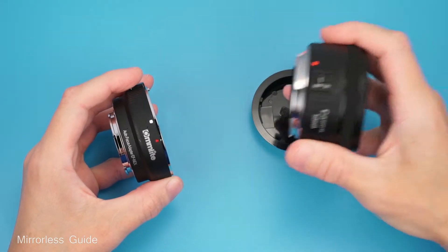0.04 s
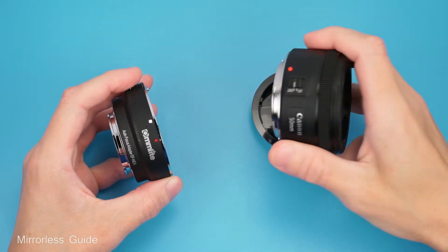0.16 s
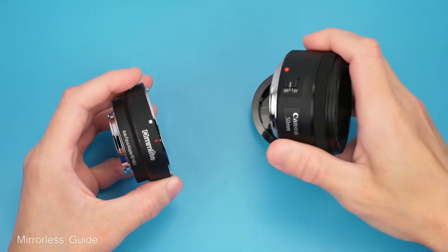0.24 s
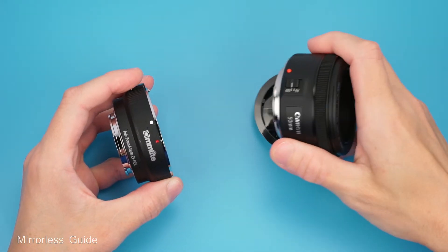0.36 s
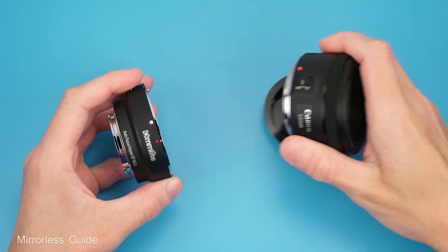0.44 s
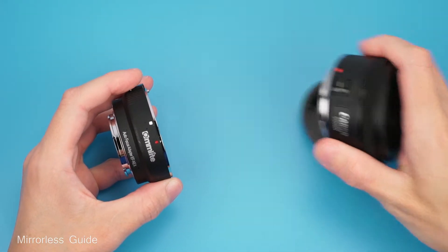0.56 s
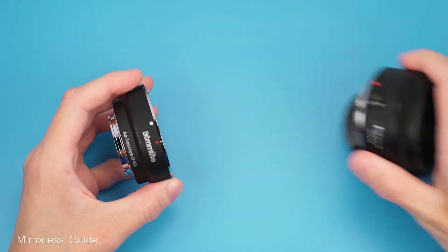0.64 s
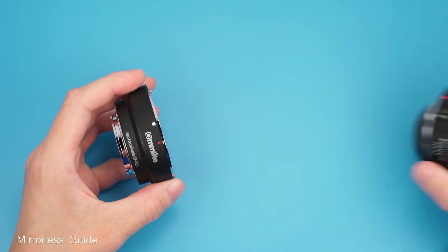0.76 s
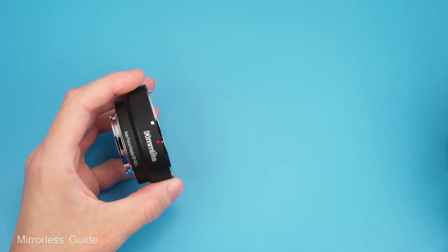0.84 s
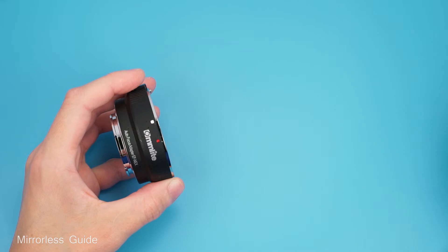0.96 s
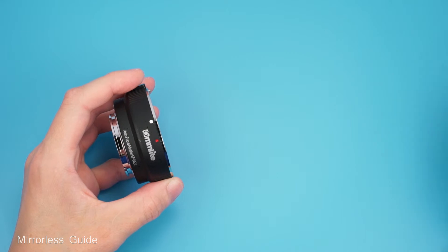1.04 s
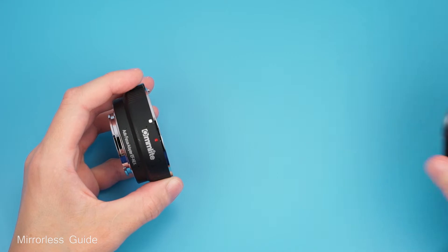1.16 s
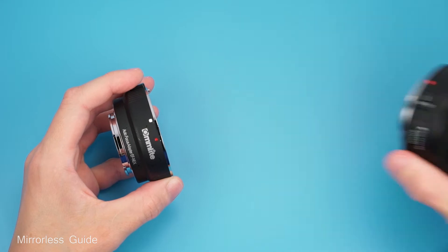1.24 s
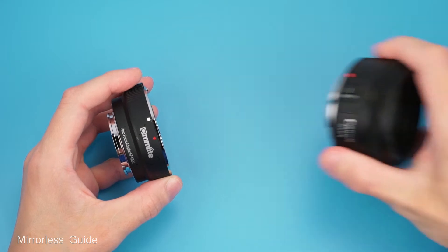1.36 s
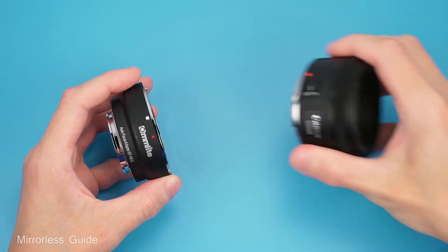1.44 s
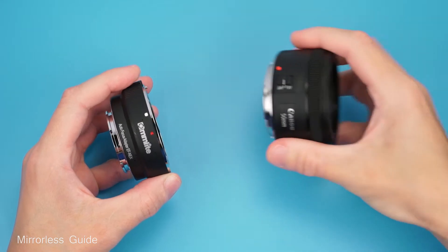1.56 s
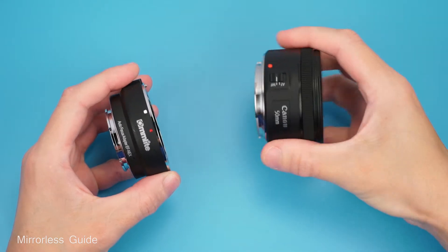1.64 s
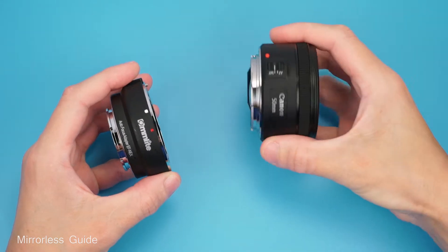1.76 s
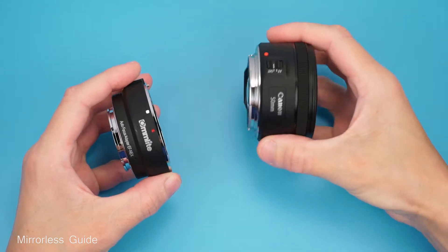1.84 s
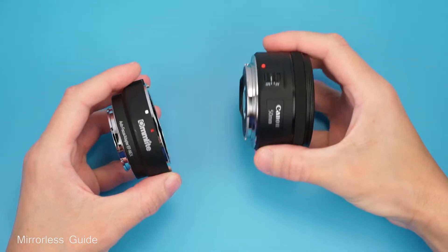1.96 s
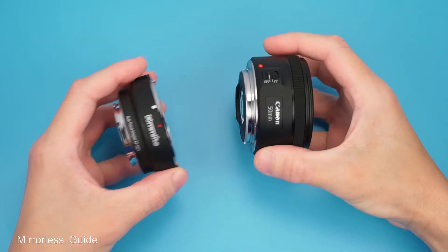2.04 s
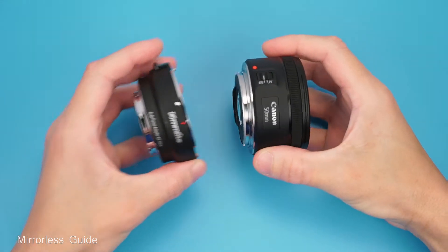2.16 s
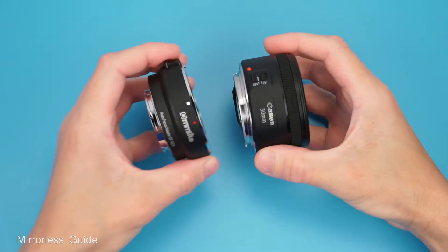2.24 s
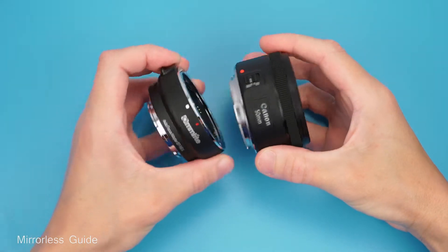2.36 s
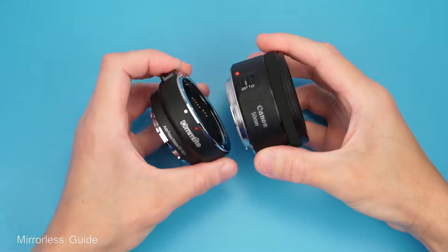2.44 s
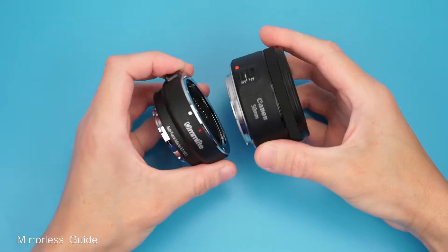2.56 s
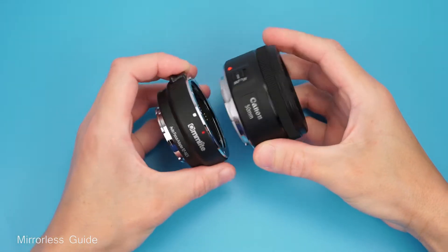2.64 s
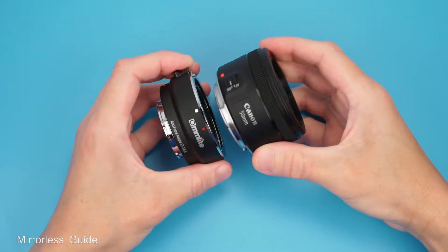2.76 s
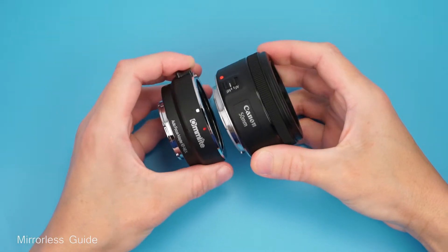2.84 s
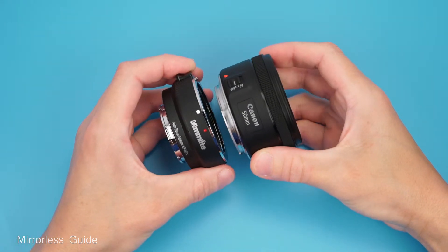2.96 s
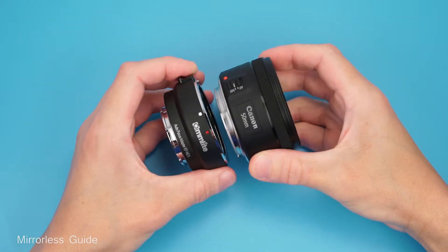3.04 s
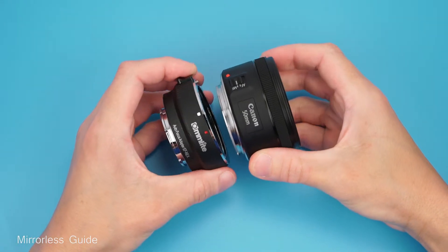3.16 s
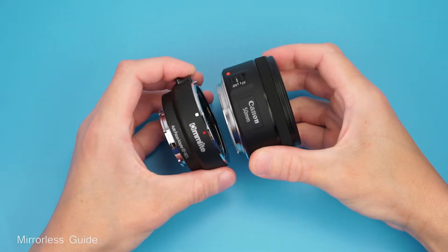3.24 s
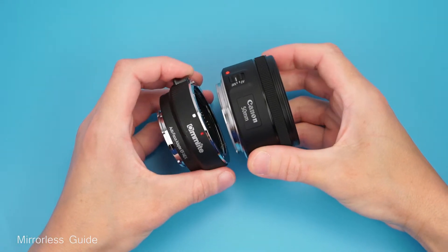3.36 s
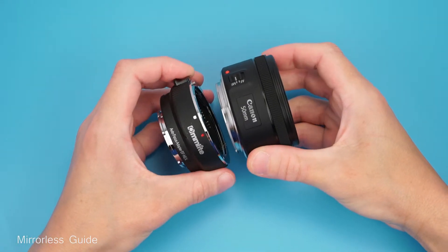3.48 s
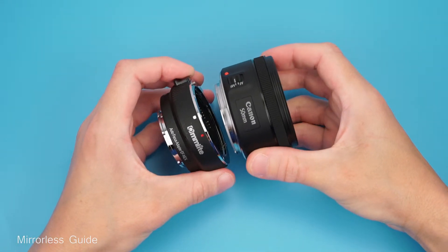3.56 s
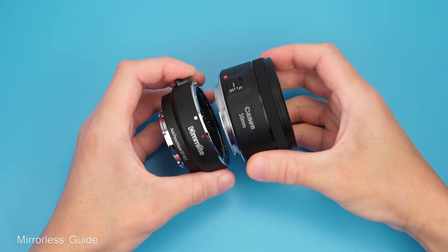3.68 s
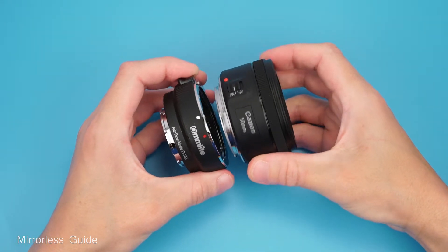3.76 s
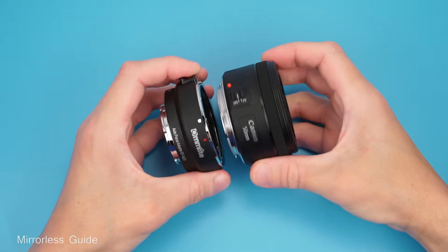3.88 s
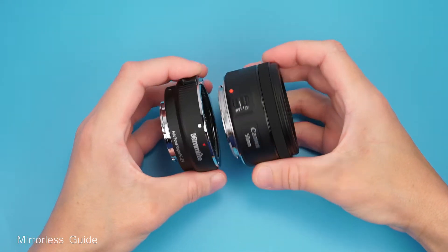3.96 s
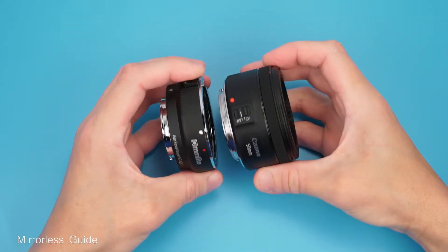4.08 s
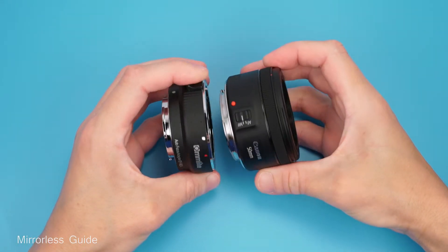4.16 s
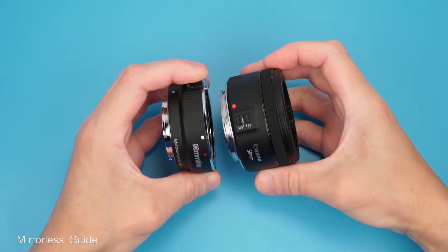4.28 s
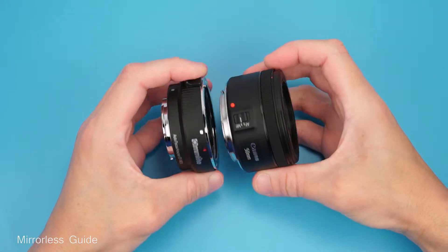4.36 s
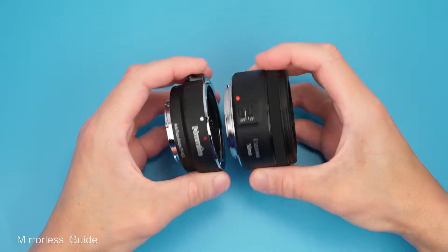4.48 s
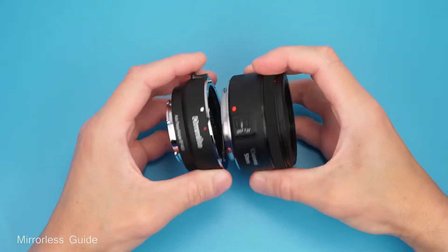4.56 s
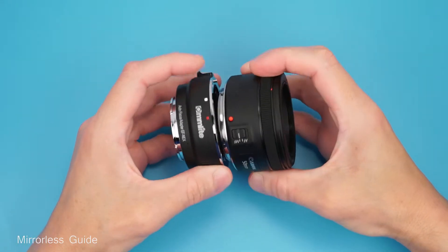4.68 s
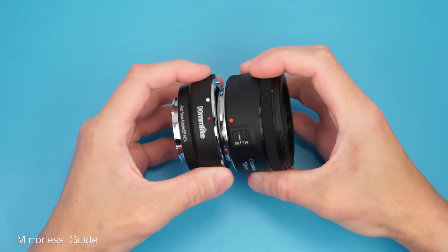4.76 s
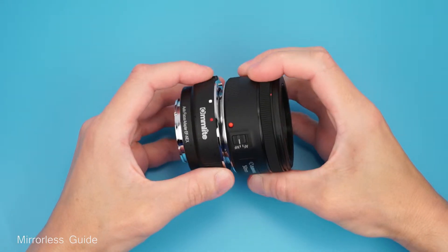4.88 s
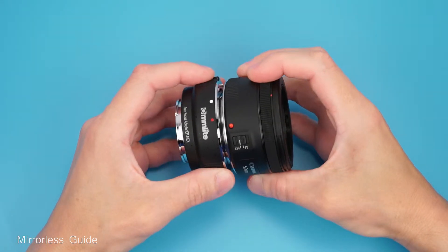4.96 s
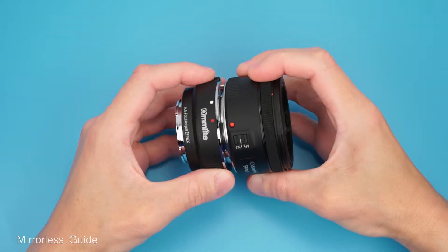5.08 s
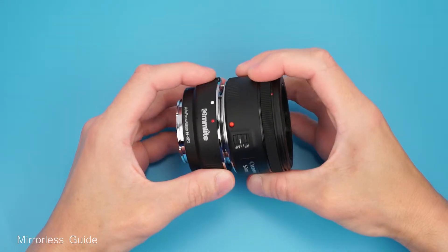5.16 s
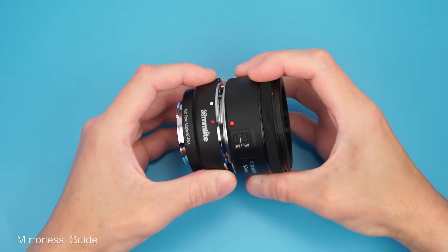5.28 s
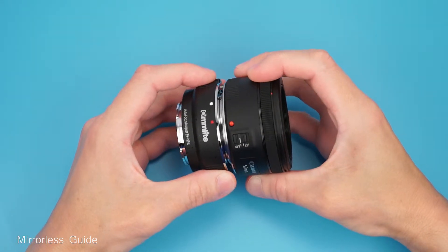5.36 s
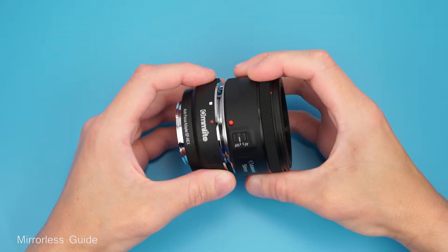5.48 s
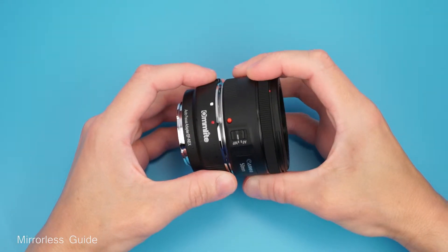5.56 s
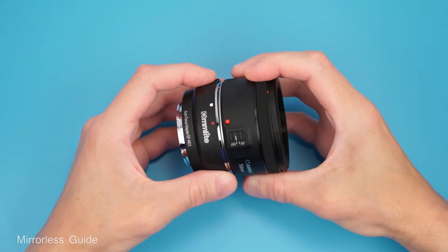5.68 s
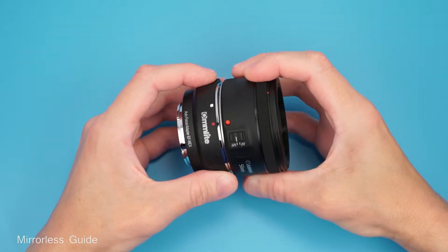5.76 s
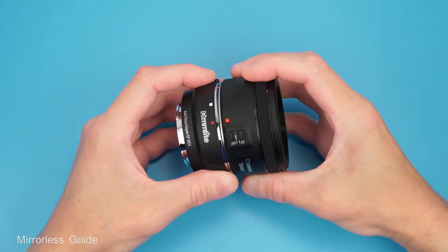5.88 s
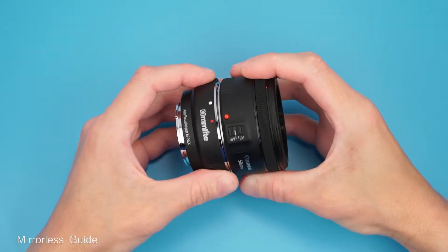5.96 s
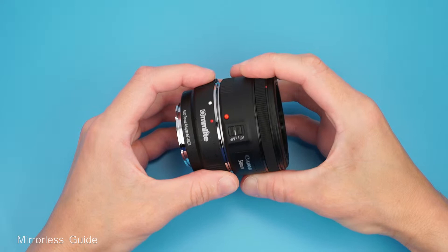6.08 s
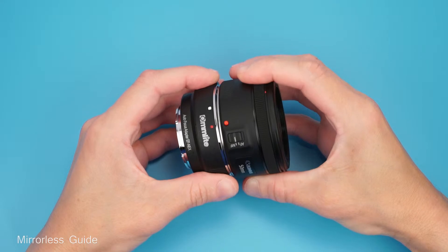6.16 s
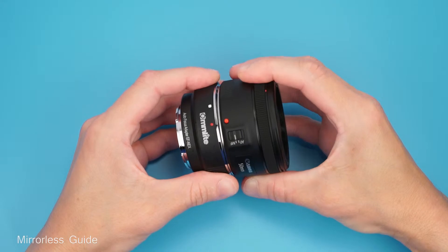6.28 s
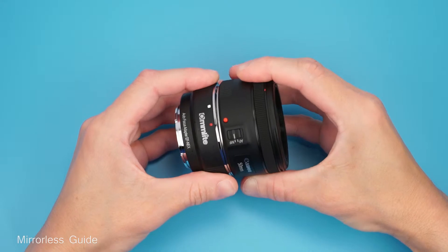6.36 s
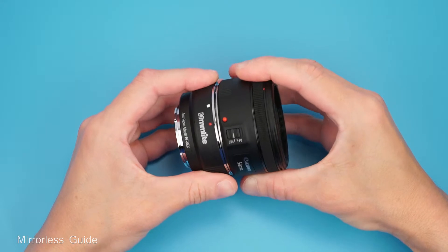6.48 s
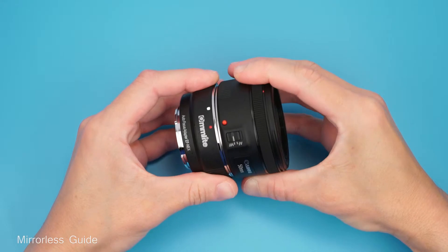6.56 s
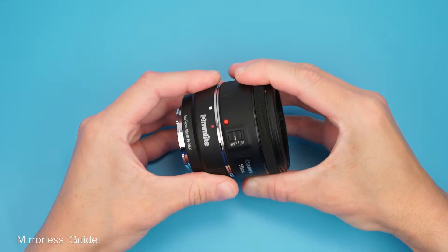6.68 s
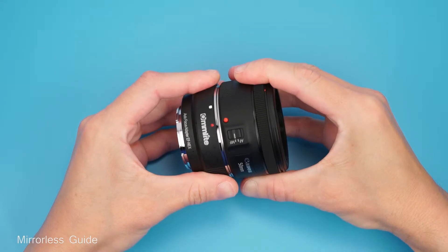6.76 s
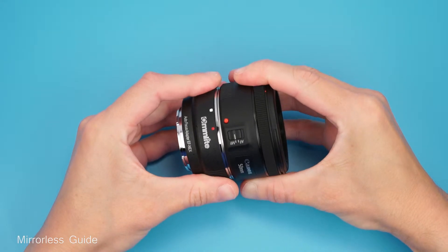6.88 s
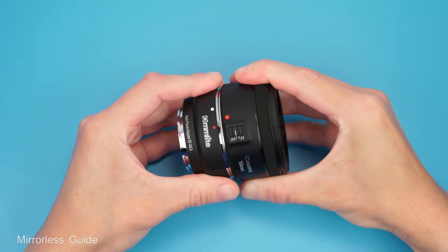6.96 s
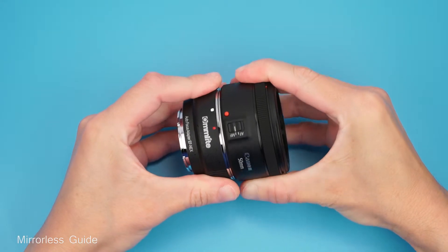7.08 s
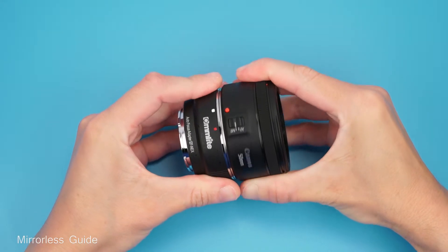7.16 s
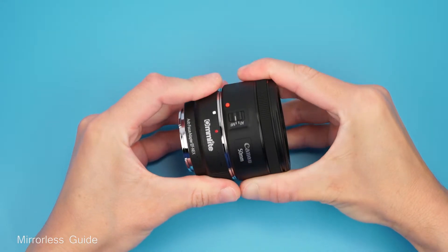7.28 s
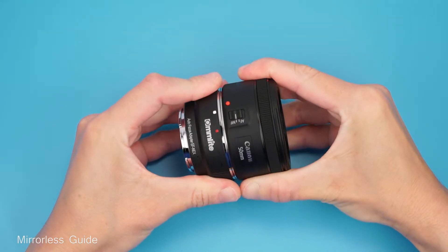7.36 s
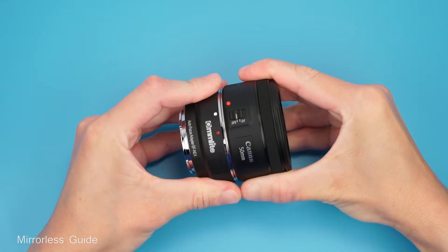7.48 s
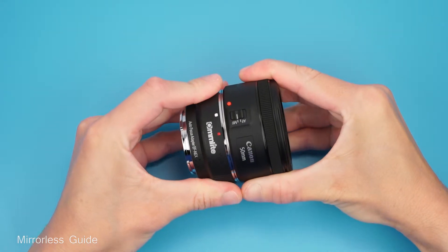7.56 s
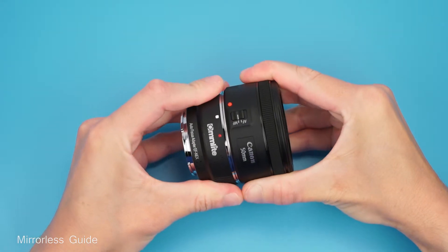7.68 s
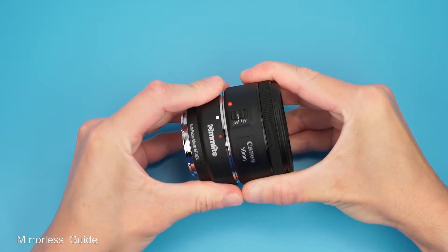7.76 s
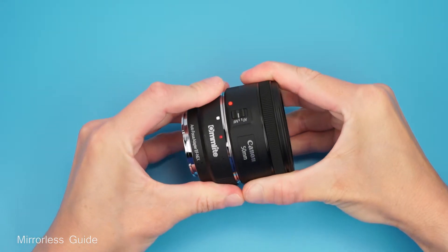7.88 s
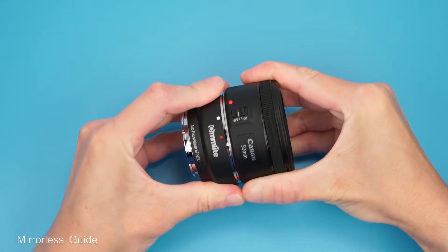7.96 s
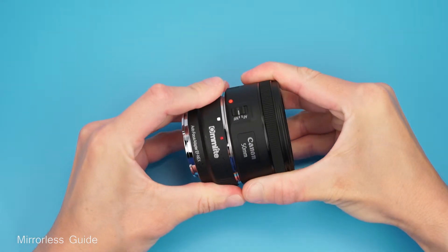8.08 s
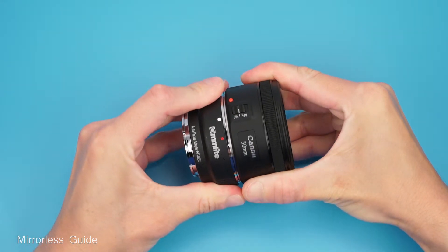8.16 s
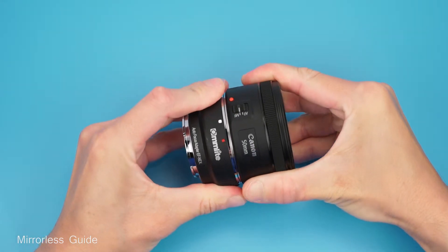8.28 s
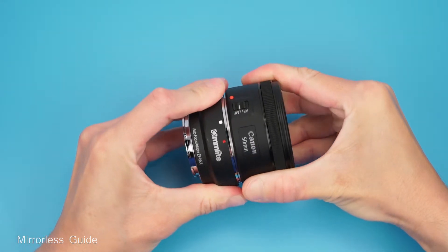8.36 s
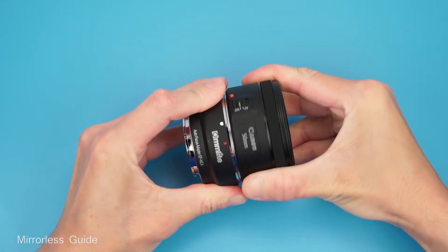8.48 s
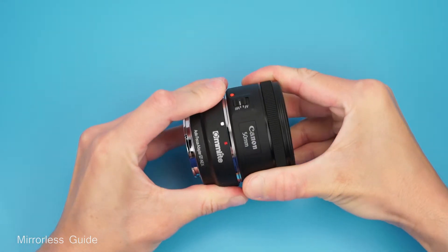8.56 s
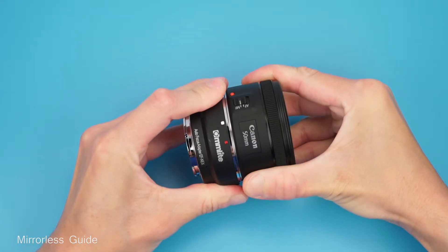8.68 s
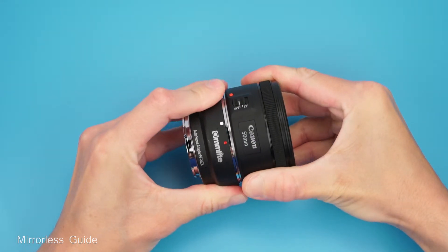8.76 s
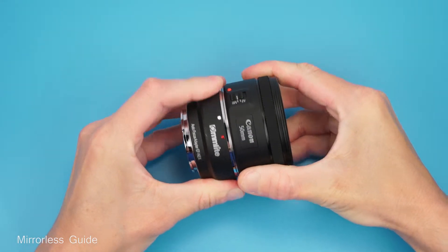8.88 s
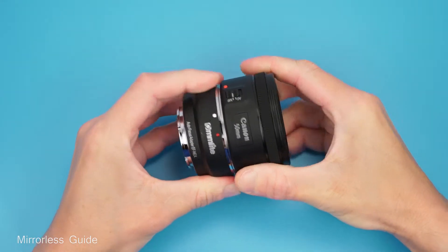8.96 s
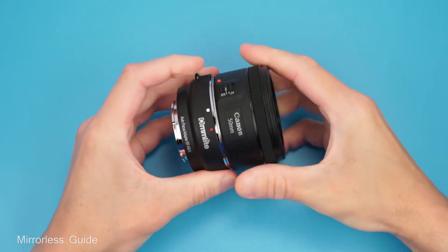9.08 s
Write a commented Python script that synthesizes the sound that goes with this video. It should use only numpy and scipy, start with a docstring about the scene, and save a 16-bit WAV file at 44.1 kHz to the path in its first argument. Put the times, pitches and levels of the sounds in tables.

```python
"""Close to a stereo microphone in a small quiet room, a plastic rear cap scrapes across a table and drops
flat with a knock (1.2 s). Fingers shift on a lens and tap a metal adapter (2.2 s). From 5 s the bayonet
mounts click, chatter and rub, ringing the metal and the air trapped between them, until they latch (8.6 s)
and the locking pin sings faintly. The room answers with a short tail over its steady hush."""
import sys
import numpy as np
from scipy import signal
from scipy.fft import rfft, irfft, next_fast_len
from scipy.io import wavfile
from scipy.ndimage import uniform_filter1d

SR = 44100
rng = np.random.default_rng(int(sys.argv[2]) if len(sys.argv) > 2 else 0)


def to_wav(sig):
    """Store sig (one row per channel, or 1-D mono) as 16-bit WAV at the path in sys.argv[1].

    Samples outside -1..1 are clipped; the rate is SR.
    """
    pcm = np.clip(np.atleast_2d(sig), -1, 1) * 32767
    pcm = np.round(pcm).astype(np.int16)
    wavfile.write(sys.argv[1], SR, pcm.T)  # frames by channels


N = 402633
HZ = np.arange(4097) * SR / 8192  # frequency axis of one hit
LEAD_S = .004  # silence ahead of each crack

# metal-on-metal hits: t/s, peak at 2.5-4.5 kHz/dB, hollow tilt/dB, treble tilt/dB, decay/ms
MOUNT_HITS = [(5.025, -36, -7.5, -5.5, 6.4), (5.093, -52, 1.5, -20, 3.9), (5.152, -55.5, -7, -22, 3),
              (5.2012, -38, -5, -9.5, 3.3), (5.277, -33, -3, -8, 2.9), (5.354, -36, -6, -12, 4.2),
              (5.3669, -33, -5, -4.5, 4.8), (5.3992, -40.5, 2.5, -10, 5.7), (5.4085, -41, -1.5, -5, 2.7),
              (5.643, -44.5, 3, -9.5, 7.2), (5.664, -45.5, 1, -13, 6), (5.682, -40.5, -8, -16, 22),
              (5.7018, -30.5, -6, 0.5, 1.7), (5.71, -16.5, -6, -3.5, 2.7), (5.7256, -27, -5, -7, 5.2),
              (5.834, -44, -9, -17, 2.4), (6.0906, -19, -9, -7.5, 2.6), (6.299, -49.5, -3.5, -8, 3.5),
              (6.313, -57, 2.5, -14, 2.2), (6.4673, -26, -4.5, -4.5, 2.5), (6.703, -59, -15.5, 0, 6.6),
              (6.721, -52.5, -12.5, -6, 5.3), (6.9122, -47, -16, 3.5, 4.1), (6.936, -44, -24, -4, 3.6),
              (6.946, -34.5, -17.5, 5, 5.5), (6.9667, -41.5, -15, -1, 4.1), (7.1, -37, -17, 4, 2.1),
              (7.108, -36.5, -15, -0.5, 5.9), (7.116, -46.5, -28, 11.5, 1.5), (7.1279, -40, -24, 2.5, 3.1),
              (7.1395, -33, -18, 2, 6.1), (7.166, -36, -27, 6.5, 5.9), (7.222, -45, -18, 2, 2.5),
              (7.2397, -37, -20, 1.5, 5), (7.255, -36.5, -23, -1, 2.4), (7.273, -33.5, -21, 4.5, 4),
              (7.3023, -37, -30, -1, 3.9), (7.3266, -32.5, -17.5, 4, 3.9), (7.382, -45, -18, -17, 1.8),
              (7.539, -51, -7, -3, 3.3), (7.568, -56, -12, 1.5, 2.8), (7.6, -60, -8, -8, 2.6),
              (7.8011, -48.5, -18, 6, 3.8), (7.8944, -60, -15, 3, 3), (7.9405, -52, -15, 7, 3.4),
              (8.13, -41, -17, 8, 4), (8.2566, -65, -10.5, 13.5, 2.8), (8.3399, -45, -9, 3, 6.2),
              (8.614, -50, -10, 3, 5.7), (8.6483, -18.5, -13, -1, 0.89)]
# modes of lens and adapter, the lowest from air trapped between them: f/Hz, width/Hz, level/dB
MOUNT_MODES = [(635, 375, 8.5), (1070, 193, 16.5), (1410, 150, 15), (2410, 430, 5.5), (2810, 142, 8.5),
               (3155, 130, 13), (3856, 117, 7.5), (4223, 163, 9.5), (5790, 106, 7)]
# mounts dragging on each other: crest t/s, swell/s, fade/s, hollow level/dB, bright level/dB
RUB_SWELLS = [(5.16, 0.33, 0.23, -68.5, -74), (5.36, .12, 0.13, -60, -76), (5.7, 0.068, 0.019, -46, -54),
              (7.1, 0.026, 0.18, -67, -59.5), (7.31, 0.26, 0.22, -66, -53.5),
              (7.41, 0.12, 0.11, -72.5, -88), (8.15, 0.79, .4, -76.5, -76),
              (8.32, 0.36, 0.23, -71.5, -66.5), (8.483, 0.06, 0.075, -63.5, -61.5),
              (8.64, 0.17, 0.022, -61, -56)]
# cap sliding, stopping, nudged again: t/s, level/dB, rings up to 2 kHz/dB, 3.6 kHz ring/dB
# (ring levels against the pair near 2.7 kHz)
CAP_PATH = [(.46, -82, 4, -6), (.535, -63, 7.5, -12.5), (.625, -47, 0, -2.5), (.655, -54.5, -2, -5),
            (.72, -41, -0.5, -3), (.775, -42, -2, 0), (.84, -41.5, 6, 0), (.89, -41, -19, 9.5),
            (.96, -49.5, -0.5, 6.5), (1.05, -56.5, -4, 0.5), (1.114, -70, -5, -11), (1.145, -47.5, 3, -2),
            (1.2, -56, -13, -3)]
# modes of the plastic cap: f/Hz, width/Hz, level/dB
CAP_MODES = [(300, 20, -29), (694, 810, -10.5), (1210, 200, -16), (2064, 88, -8), (2400, 84, -5.5),
             (2905, 33, -12), (3620, 450, 9.5), (4530, 800, -10.5), (5770, 110, -21), (7270, 230, -9.5),
             (8870, 96, -8.5), (10460, 200, -14), (12900, 1500, -33)]
# how hard the cap's drop strikes each range: f/Hz, level/dB
KNOCK_EQ = [(150, -12), (240, 12), (330, 19.5), (550, 9.5), (1000, 11), (1500, 15), (2100, 6), (3000, 7.5),
            (3600, -24), (5500, -2), (6800, 10), (9500, 6), (14000, 1)]
# skin peeling off the barrel: t/s, starting level/dB, left minus right/dB, decay/ms
SKIN_PEELS = [(2.7157, -58, 4, 8.5), (2.9314, -47, 4, 4.3), (2.967, -51, -4, 3.4),
              (3.0498, -49.5, -0.5, 3.3), (3.074, -50.5, -1.5, 2.9), (3.0983, -57, 0.0, 12)]
# tone of skin on the barrel: f/Hz, level/dB
SKIN_EQ = [(880, -12), (1500, -2.5), (2020, -5), (3280, -12), (3960, 4.5), (5280, -6.5), (8240, 0.5),
           (16000, -8.5)]
# hands shifting their grip: crest t/s, swell/s, fade/s, shuffle level/dB, skin level/dB
GRIP_SWELLS = [(1.54, 0.032, 0.06, -84, -63), (1.87, 0.27, .15, -93, -67.5), (2.17, 0.15, .05, -79, -64),
               (2.21, 0.062, 0.3, -70.5, -74), (2.42, 0.63, 0.74, -70.5, -79), (2.91, .05, 0.031, -74, -86),
               (3.1, 0.46, 0.41, -67, -90)]
# modes of the loose adapter: f/Hz, width/Hz, level/dB
ADAPTER_MODES = [(350, 240, -1), (900, 710, 0.5), (1510, 260, 8), (2120, 710, 1.5), (4060, 2400, -5.5),
                 (9500, 7900, -12)]
# bands of the room's tail: f/Hz, t60/s, level/dB, left-right likeness/0-1
ROOM_BANDS = [(252, 0.94, 6, 1), (670, 0.58, 3.5, 0.72), (1405, 0.55, 2.5, 0.51), (2630, 0.41, 0.5, 0),
              (5570, 0.51, -1, 0), (9900, 0.37, 0.5, 0.03)]
# tone of the hush: f/Hz, level/dB
HUSH_EQ = [(15, -61), (25, -8.5), (108, -3.5), (208, -5), (368, -9), (600, -10.5), (669, -11), (854, -13),
           (1470, -17), (2150, -15), (2460, -18.5), (4480, -21.5), (14400, -26.5), (16500, -28)]
# stereo image of the hush: f/Hz, left-right likeness/0-1
HUSH_LIKENESS = [(60, 1), (130, 0.9), (290, 0.63), (640, 0.08), (1410, 0.08), (3100, 0.07), (6820, 0.22),
                 (15000, 0.2)]

MOUNT_PAN_DB, CAP_PAN_DB = -2.5, -1.5  # left minus right
LATCH_S, KNOCK_S, TAP_S = 8.649, 1.2133, 2.1959
# once the mounts seat, the gap closes and the lowest notes sink against the hollow note
SEATED_S, LOOSE_LOW_DB, SEATED_LOW_DB = 5.9, -1.5, -7.5


def mount_clicks():
    """Each contact is a brief rough crack that stirs the mount's modes. Returns direct sound and send."""
    direct, send = np.zeros((2, 2, N))
    # the treble differs between the sides and leans left
    spread = .74 * np.clip(HZ / 8000, 0, 1) * np.array([[1], [-1]])
    pan_db = MOUNT_PAN_DB + 4.5 * np.clip(HZ / 12000, 0, 1)
    presence = (HZ > 2500) & (HZ < 4500)
    for s, peak_db, hollow_db, treble_db, ms in MOUNT_HITS:
        mid, side = crack(ms)
        jitter = rng.standard_normal((len(MOUNT_MODES), 2))
        is_latch = abs(s - LATCH_S) < .01
        ring_db, send_db = (-8, 2) if is_latch else (.5, -4)
        low_db = hollow_db + (SEATED_LOW_DB if s > SEATED_S else LOOSE_LOW_DB)
        edge_db = 1.25 * treble_db - 1  # dull contacts lose the top octave first
        tilt_db = on_log(HZ, [(250, low_db - 12), (600, low_db - 4.5), (1100, low_db),
                              (1300, hollow_db), (1600, hollow_db), (2600, .021), (4400, 0),
                              (5400, treble_db), (7800, treble_db), (9400, edge_db),
                              (15000, edge_db - 1.5)])
        modes = [(hz * (1 + .02 * detune), width, db + ring_db + 1.8 * accent)
                 for (hz, width, db), (detune, accent) in zip(MOUNT_MODES, jitter)]
        tone = undb(tilt_db) * (1 + resonances(HZ, modes))
        click = irfft(stereo((mid + spread * side) * tone, pan_db))
        click *= undb(peak_db) / np.abs(irfft(mid * tone * presence)).max()
        add(direct, s - LEAD_S, click)
        add(send, s - LEAD_S, undb(send_db) * click)
    return direct, send


def locking_pin(hz=11600, level_db=-55, t60_s=.6):
    """The pin sings one faint high note after it drops."""
    t = np.arange(SR // 2) / SR
    note = undb(level_db) * np.exp(-np.log(1000) * t / t60_s) * np.sin(2 * np.pi * hz * t)
    return place(LATCH_S, stereo(note, 0))


def mount_rub():
    """Stick-slip between the mounts keeps the trapped air and the metal rings humming."""
    slips = grit(1.55)
    low, hollow = (unit(colour(slips, lambda f: resonances(f, [mode]) * np.clip(f / 900, 0, 1) ** 2))
                   for mode in MOUNT_MODES[1:3])
    low_db = np.where(np.arange(N) > SEATED_S * SR, SEATED_LOW_DB, LOOSE_LOW_DB)
    air = hollow - undb(low_db) * low
    metal = unit(colour(grit(1.5), lambda f: (1 + undb(-2) * resonances(f, MOUNT_MODES[3:]))
                        * np.clip(f / 2500, 0, 1) ** 3))
    air_gain, metal_gain = swells(RUB_SWELLS)
    patchiness = undb(2 * walk(per_s=40))
    return stereo((air_gain * air + metal_gain * metal) * patchiness, MOUNT_PAN_DB)


def cap_slide():
    """The rim scrapes the table; as the contact wanders it favours one resonance, then another."""
    slips = colour(grit(.8), lambda f: np.clip(f / 1700, .05, 1) ** 6 / (1 + (f / 9000) ** 2))
    # pressed on the table, the higher rings are damped and widen
    damped = [(hz, width * (1.12 + hz / 4000), db) for hz, width, db in CAP_MODES[1:]]
    rings = [undb(5.2 * walk(per_s=16)) * colour(slips, lambda f: resonances(f, [mode]))
             for mode in damped]
    gate, level_db, low_db, bite_db = automation(CAP_PATH)
    groups = [(rings[:3], low_db), (rings[3:5], 0), (rings[5:6], bite_db),
              (rings[6:9], -2), (rings[9:], -16.5)]
    rasp = sum(undb(db) * even(sum(group)) for group, db in groups)
    # the table top answers with a dull rumble that swells less than the rasp
    rumble = unit(colour(grit(.34), lambda f: resonances(f, [(413, 150, 0), (810, 510, 0)])))
    return stereo(gate * (undb(level_db) * rasp + undb(.27 * level_db - 57.5) * rumble), CAP_PAN_DB)


def cap_knock(thud_hz=266, thud_rise_s=.017):
    """The cap drops flat and the table top booms a moment later. Returns direct sound and send."""
    strike = irfft(crack(ms=2.24)[0] * resonances(HZ, CAP_MODES) * undb(on_log(HZ, KNOCK_EQ)))
    knock = stereo(peak(strike, db=-20.5), CAP_PAN_DB)
    t = np.arange(8192) / SR
    bloom = (t / thud_rise_s * np.exp(-t / thud_rise_s)) ** 3
    thud = stereo(peak(bloom * np.sin(2 * np.pi * thud_hz * t), db=-46.5), CAP_PAN_DB)
    # a small cap radiates its lows poorly into the room
    send = undb(-3) * colour(knock, lambda f: np.clip(f / 700, 0, 1))
    return place(KNOCK_S - LEAD_S, knock) + place(KNOCK_S, thud), place(KNOCK_S - LEAD_S, send)


def adapter_tap():
    """One soft fingertip blow rings the loose adapter."""
    ring = irfft(crack(ms=3.4)[0] * resonances(HZ, ADAPTER_MODES))
    return place(TAP_S - LEAD_S, stereo(peak(ring, db=-37), MOUNT_PAN_DB))


def fingers():
    """Skin peels and slides on the barrel in short bright crackles, over the dull shuffle of hands."""
    skin = unit(colour(grit(1.6), lambda f: undb(on_log(f, SKIN_EQ))))
    crackles = np.zeros((2, N))
    t = np.arange(3000) / SR
    for s, level_db, pan_db, ms in SKIN_PEELS:
        peel = skin[int(s * SR):][:len(t)] * np.exp(-t * 1000 / ms)
        add(crackles, s, stereo(undb(level_db) * peel, pan_db))
    shuffle_modes = [(300, 450, 18), (810, 460, -25), (1990, 240, 12.5)]
    shuffle = unit(colour(grit(1.5), lambda f: resonances(f, shuffle_modes)))
    shuffle_gain, skin_gain = swells(GRIP_SWELLS)
    return crackles + shuffle_gain * shuffle + skin_gain * skin


def room(send, return_db=-3, rise_s=.0013):
    """A diffuse tail builds over the first reflections and dies by band, narrow low down, wide on top."""
    t = np.arange(SR // 2 + SR // 4) / SR
    tail = 0
    for hz, t60, db, likeness in ROOM_BANDS:
        noise = rng.standard_normal((2, len(t)))
        mid, side = colour(noise, lambda f: np.exp(-2 * np.log2(np.maximum(f, 1) / hz) ** 2))
        mid, side = mid * np.sqrt(1 + likeness), side * np.sqrt(1 - likeness)
        tail += undb(db) * np.array([mid + side, mid - side]) * np.exp(-np.log(1000) * t / t60)
    tail *= np.clip(t / rise_s, 0, 1) ** 2
    tail /= np.linalg.norm(tail[0])
    return undb(return_db) * signal.fftconvolve(send.mean(0)[None], tail, axes=1)[:, :N]


def hush(level_db=-66.5):
    """A bed of room air and microphone hiss; the bass is shared by both sides."""
    mid, side = rng.standard_normal((2, N))
    mid = colour(mid, lambda f: undb(on_log(f, HUSH_EQ)) * np.sqrt(1 + on_log(f, HUSH_LIKENESS)))
    side = colour(side, lambda f: undb(on_log(f, HUSH_EQ)) * np.sqrt(1 - on_log(f, HUSH_LIKENESS)))
    return undb(level_db) * np.array([mid + side, mid - side]) / mid.std()


def crack(ms):
    """Spectra of two rough, decaying bursts with even colour, starting LEAD_S in."""
    t = np.arange(8192) / SR - LEAD_S
    burst = rfft(rng.standard_normal((2, len(t))) * (t > 0) * np.exp(-np.abs(t) * 1000 / ms))
    return burst / np.sqrt(uniform_filter1d(np.abs(burst) ** 2, size=60))


def grit(scatter_db):
    """Dense tiny slips of uneven size."""
    noise = rng.standard_normal(N)
    sizes = np.repeat(rng.exponential(size=N // 16 + 1), 16)[:N]
    return unit(noise * undb(scatter_db * sizes))


def resonances(f, modes):
    """Causal response of modes (f/Hz, width/Hz, level/dB) with alternating signs."""
    return sum((-1) ** k * undb(db) * 1j * f * width / (hz * hz - f * f + 1j * f * width)
               for k, (hz, width, db) in enumerate(modes))


def swells(rows, depth_db=30):
    """Two gain tracks; each row climbs depth_db over its swell time and falls as much over its fade."""
    t, gains = np.arange(N) / SR, np.zeros((2, N))
    for s, rise, fade, *levels_db in rows:
        span = slice(int((s - 2 * rise) * SR), int((s + 2 * fade) * SR))
        away = np.maximum((s - t[span]) / rise, (t[span] - s) / fade)
        gains[:, span] += undb(np.array(levels_db)[:, None] - depth_db * away)
    return gains


def automation(rows):
    """A gate that closes softly outside the rows' times, then each column at every sample."""
    s, *columns = np.transpose(rows)
    t = np.arange(N) / SR
    gate = np.interp(t, [s[0] - .01, s[0], s[-1], s[-1] + .018], [0, 1, 1, 0])
    return gate, *(np.interp(t, s, column) for column in columns)


def walk(per_s):
    """Random levels, each gliding into the next."""
    hold = int(SR / per_s)
    return 2.74 * uniform_filter1d(np.repeat(rng.standard_normal(N // hold + 1), hold), hold)[:N]


def even(x):
    """Hold the loudness of x steady while its colour wanders."""
    return x / np.sqrt(uniform_filter1d(x ** 2, size=2000) + 1e-18)


def colour(x, gain):
    """Filter x by a gain given as a function of Hz."""
    size = next_fast_len(x.shape[-1])
    return irfft(rfft(x, size) * gain(np.arange(size // 2 + 1) * SR / size), size)[..., :x.shape[-1]]


def on_log(f, points):
    """Read (f/Hz, value) points on a log-frequency axis."""
    hz, values = np.transpose(points)
    return np.interp(np.log(np.maximum(f, 1)), np.log(hz), values)


def undb(db):
    return 10 ** (np.asarray(db) / 20)


def unit(x):
    return x / np.sqrt(np.mean(x ** 2))


def peak(x, db):
    return x * undb(db) / np.abs(x).max()


def stereo(x, pan_db):
    return x * undb(np.array([pan_db, -pan_db]) / 2).reshape(2, -1)


def add(track, s, x):
    i = int(s * SR)
    track[:, i:i + x.shape[1]] += x[:, :N - i]


def place(s, x):
    track = np.zeros((2, N))
    add(track, s, x)
    return track


def scene():
    """Mix the close sounds, the room's answer and the hush."""
    clicks, clicks_send = mount_clicks()
    slide = cap_slide()
    knock, knock_send = cap_knock()
    handling = slide + mount_rub() + fingers() + adapter_tap()
    return clicks + locking_pin() + knock + handling + room(clicks_send + knock_send + handling) + hush()


def record(dry, top_hz=16000):
    """A steep low-pass cuts the top."""
    return signal.sosfilt(signal.ellip(10, .2, 60, top_hz, fs=SR, output="sos"), dry)


dry = scene()
out = record(dry)
to_wav(out)
```